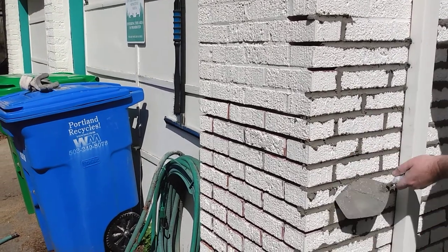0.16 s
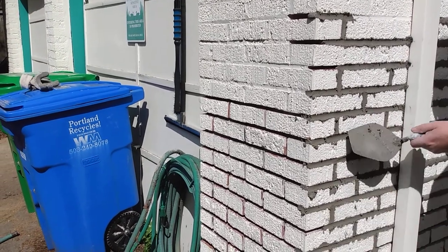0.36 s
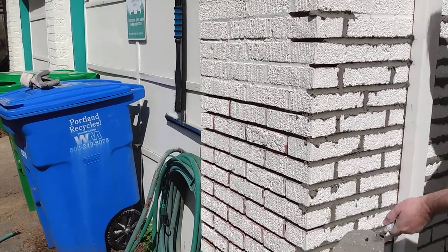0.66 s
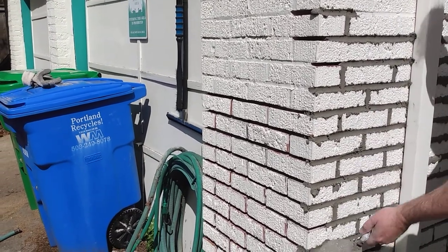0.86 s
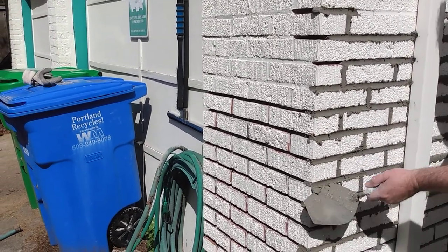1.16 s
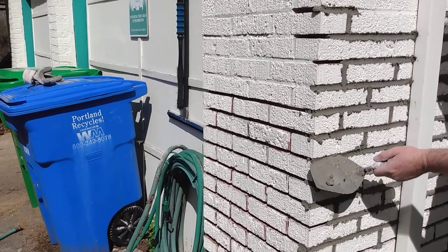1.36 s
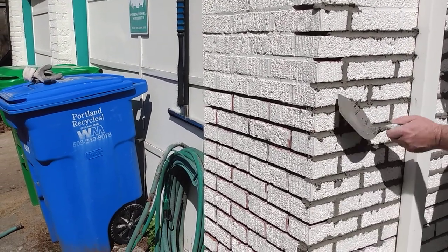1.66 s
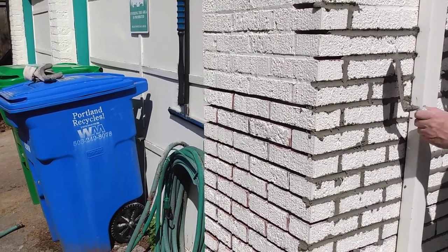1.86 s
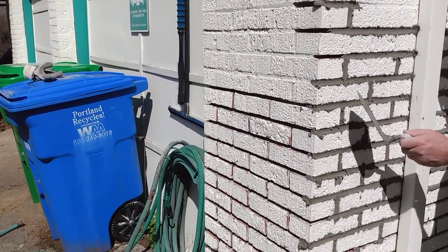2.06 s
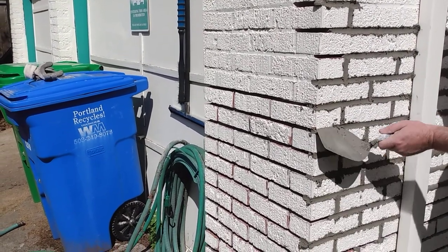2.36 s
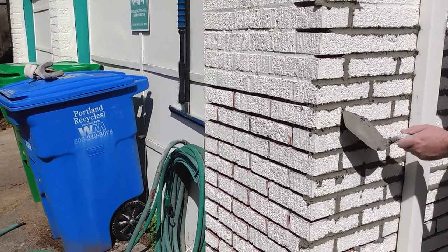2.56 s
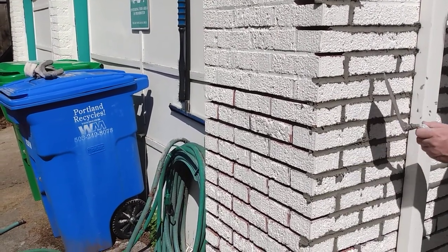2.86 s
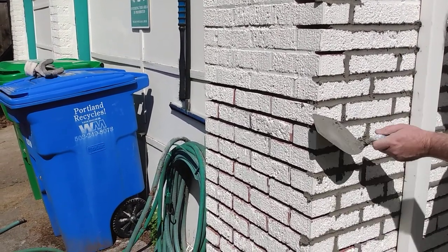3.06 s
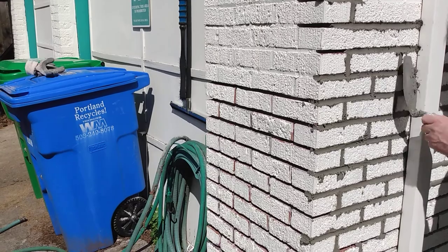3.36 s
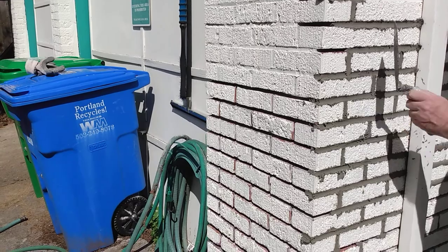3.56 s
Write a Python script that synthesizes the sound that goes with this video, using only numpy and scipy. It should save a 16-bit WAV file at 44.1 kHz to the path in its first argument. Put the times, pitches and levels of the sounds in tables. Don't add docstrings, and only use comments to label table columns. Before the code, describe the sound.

A steel trowel scrapes gritty mortar on brick, close in stereo outdoors. The first stuttering rasp runs 0-0.37 s, the blade briefly ringing on as crumbs patter. Scrapes follow at 0.93-1.45, 1.55-1.9 and 2.33-2.68 s, then a short, lighter one at 2.73-2.82. After a pause, the loudest stroke scratches from 3.18 to 3.45 s, ending in a sharp metallic catch and falling bits. Low distant traffic hums throughout.

```python
import sys
import numpy as np
from scipy import signal
from scipy.fft import rfft, irfft
from scipy.io import wavfile
from scipy.ndimage import uniform_filter1d

SR = 44100
rng = np.random.default_rng(int(sys.argv[2]) if len(sys.argv) > 2 else 0)


def pcm_store(signal):
    levels = np.round(np.clip(np.atleast_2d(signal), -1, 1) * 32767)
    wavfile.write(sys.argv[1], SR, levels.astype(np.int16).T)


def convert_level_to_amplitude(level_db):
    exponent = np.asarray(level_db, float) / 20
    return 10 ** exponent


N = 163170

# (frequency [Hz], level [dB])
TRAFFIC = [(22, -18.5), (38, -5.5), (75, -1), (289, -8.5), (928, -8.5), (2760, -32.5), (7810, -42),
           (14000, -39.5), (16300, -45)]
# (frequency [Hz], likeness [0 to 1])
TRAFFIC_LIKENESS = [(40, 0.97), (300, 0.94), (2000, 0.05)]
# (start [s], length [s], hiss level [dB], thud level [dB])
CRUMBS = [(0.45, 0.077, -48, -43), (0.37, 0.062, -63, -68), (2.034, .02, -61.5, -70),
          (0.574, 0.0047, -57, -82), (0.595, 0.0033, -56, -59), (0.63, .003, -61, -72),
          (0.648, 0.0044, -60, -70), (0.741, .004, -63, -71), (0.762, .003, -62, -85),
          (0.776, .003, -63, -85), (0.796, .004, -60, -85), (0.825, .004, -58, -85),
          (0.836, 0.011, -63, -87), (0.855, .003, -61, -85), (0.902, .006, -64, -85),
          (0.918, 0.0033, -55, -85), (3.028, .003, -59.5, -78), (3.055, .003, -72, -75),
          (1.476, 0.023, -51, -51), (1.938, 0.008, -56, -90), (1.99, 0.025, -49.5, -63),
          (2.246, 0.0027, -65, -88), (2.293, .003, -63, -82.5), (3.48, 0.0059, -38.5, -30.5),
          (3.504, 0.013, -85, -45)]
# (frequency [Hz], level [dB])
GRIT = [(700, -25), (1500, -2), (4400, -4), (7700, -5), (10400, 0), (14100, 3), (15800, -6), (16200, -37)]
# (frequency [Hz], width [Hz], level [dB])
WALL = [(295, 16, -6.5), (434, 182, 8), (646, 15, -2), (960, 440, -31)]
# (frequency [Hz], width [Hz])
BLADE = [(1104, 14), (1200, 24), (1555, 26), (1712, 60), (1772, 17), (1970, 26), (2308, 28), (2438, 21),
         (2572, 26), (2850, 34), (3280, 22), (3844, 28), (4150, 36), (4750, 130)]
# (level of each BLADE ring [dB], ...)
GRIP = [(-17, -9.5, -22.5, -12, 1.5, -18, -17, -12.5, -25.5, -14.5, -12, -17.5, -24.5, -36.5),
        (-23.5, -10.5, -33, -25.5, -0.5, -16.5, -16.5, -13, -29.5, -15, -13, -55, -58, -57),
        (-31.5, -13.5, -18, -21.5, -7, -22, -14, -4.5, -21, -16, -10, -18, -19, -32.5),
        (-15, -15, -14, -16, -9.5, -23, -18, -9, -21, -16, -14, -20, -16.5, -26),
        (-27, -0.5, -28, -16, 3.5, -12.5, -5, 1, -2, -26, -12, -27, -8, -12),
        (-21, -7.5, -15, -8.5, -12.5, -13.5, -6.5, -7.5, -8, -14.5, -19, -13, -22.5, -17)]
# (frequency [Hz], width [Hz], level [dB])
EDGE = [(2580, 450, -18.5), (3260, 100, -16.5), (3640, 250, -22.5), (4125, 160, -21), (4636, 180, -22.5),
        (5590, 150, -24.5), (5850, 130, -20), (6090, 130, -21.5), (6560, 120, -28)]
# (frequency [Hz], time to fall 60 dB [s])
FREE_BLADE = [(1104, .5), (1774, .18), (2304, .2), (2441, .2)]
# (time [s], time until damped [s], then the level of each FREE_BLADE ring [dB])
LIFTS = [
    (.36, .3, -29.5, -25, -33, -35),
    (1.899, 0.094, -36.5, -40, -45.5, -52),
    (2.78, 0.187, -32.5, -44, -60, -53),
    (3.435, 0.057, -34, -46, -32, -45),
]
# (time [s], length [s], grit level [dB], blade level over grit [dB])
FIRST = [(0, 0.019, -42.5, -3.5), (.03, 0.033, -47.5, 8.5), (.056, 0.0071, -51, -2),
         (.066, 0.013, -50, 12.5), (.085, 0.009, -43.5, 2.5), (.1, 0.029, -42, 6), (.134, 0.016, -39, 1),
         (.154, 0.046, -49.5, 8), (.207, 0.0045, -39, 4), (.216, 0.035, -47.5, 9),
         (.257, 0.0073, -40.5, 1.5), (.279, 0.0088, -33.5, -4.5), (.329, 0.012, -40.5, 3),
         (.359, 0.0091, -32, 7)]
SECOND = [(0.932, 0.0072, -34.5, -11.5), (0.952, 0.046, -52.5, -4), (0.984, 0.023, -43.5, 8.5),
          (1.01, 0.01, -51.5, 17), (1.024, 0.012, -39, 12), (1.055, 0.023, -43, 10.5),
          (1.099, 0.021, -50, 15.5), (1.133, 0.013, -50.5, 15), (1.144, 0.0075, -47, 9),
          (1.17, 0.012, -39, 3.5), (1.226, 0.013, -37.5, 0.5), (1.243, 0.0074, -51, 18.5),
          (1.257, 0.029, -72, 8), (1.283, 0.012, -42, 6.5), (1.325, 0.028, -48.5, 14),
          (1.364, 0.011, -52.5, 16.5), (1.393, 0.0059, -45.5, 5), (1.414, 0.0042, -42, 8.5),
          (1.419, 0.0099, -48, 5), (1.436, 0.0031, -39.5, -3.5)]
THIRD = [(1.548, 0.015, -48, 12), (1.59, 0.011, -38, -1), (1.624, 0.022, -47.5, 8),
         (1.677, 0.026, -46.5, 6), (1.71, 0.009, -47.5, 8.5), (1.732, 0.017, -44, 8),
         (1.764, 0.0068, -29.5, -8), (1.78, 0.007, -33, -9), (1.793, 0.016, -37, 3.5),
         (1.809, .01, -37, -1), (1.821, .014, -40.5, 7), (1.838, 0.0062, -39.5, -1.5),
         (1.855, 0.0059, -36.5, 0), (1.886, 0.022, -43.5, -2)]
FOURTH = [(2.327, 0.014, -45.5, -10), (2.353, 0.009, -40.5, -6), (2.37, 0.011, -39, 1),
          (2.389, 0.01, -33.5, -1), (2.402, 0.0089, -32, -3), (2.417, 0.0072, -35.5, -13),
          (2.427, 0.05, -43, -3.5), (2.48, 0.055, -39.5, -11), (2.548, 0.0086, -36, -0.5),
          (2.566, 0.019, -42.5, 1), (2.583, 0.0056, -44, 2.5), (2.597, 0.022, -38, 2),
          (2.629, 0.052, -47, -0.5)]
FIFTH = [(2.726, 0.011, -52.5, 4.5), (2.754, 0.0029, -40.5, 5.5), (2.761, 0.01, -53, 7.3),
         (2.777, 0.0058, -45.5, 7.4), (2.791, .014, -45, 2.3), (2.809, 0.007, -36, 1.2)]
SIXTH = [(3.179, 0.0066, -45.5, 0.5), (3.191, 0.022, -54.5, 9), (3.245, 0.0067, -30, -11.5),
         (3.281, 0.008, -31.5, -11), (3.293, 0.032, -37.5, 2), (3.319, 0.05, -36.5, 4),
         (3.359, 0.037, -33, 4.5), (3.388, 0.0088, -33.5, 7.5), (3.398, .01, -31, 5),
         (3.411, 0.0055, -34, 9), (3.418, 0.012, -23, -15), (3.427, 0.0098, -26.5, 5.5),
         (3.443, 0.0064, -43.5, 9.5)]
# (wall level [dB], coarse grit level [dB])
STROKES = [(-48.5, -17), (-50.5, -7), (-52.5, -1), (-57, -15), (-56.5, -18), (-56, -10)]
# (frequency [Hz], level [dB])
LEFT_OVER_RIGHT = [(500, -.5), (2000, 3), (4000, -2.05), (8000, -4), (13000, -1)]
# (frequency [Hz], phase [radians])
LEFT_LEAD = [(0, 0), (1800, 2.0), (2430, 1.3), (3360, 3.2), (4130, 5.7), (5900, 7), (22050, 25)]


def evened(x):
    return x / np.sqrt(np.mean(x ** 2) + 1e-20)


def read(points, hz):
    f, value = np.transpose(points)
    return np.interp(np.log(hz + 1), np.log(f + 1), value)


def colour(x, points):
    gain = convert_level_to_amplitude(read(points, np.fft.rfftfreq(N, 1 / SR)))
    return irfft(rfft(x) * gain, N)


def ring(x, hz, width):
    r = np.exp(-np.pi * max(width, 1) / SR)
    pole = r * np.exp(2j * np.pi * hz / SR)
    return np.sqrt(4 * (1 - r)) * signal.lfilter([1], [1, -pole], x).real


def air():
    wash_db, hum_db = -51, -51
    hum_hz, hum_width = 65.3, 17.2
    hz = np.fft.rfftfreq(N, 1 / SR)
    left, other = rfft(rng.standard_normal((2, N)))
    same = np.clip(read(TRAFFIC_LIKENESS, hz), -1, 1)
    right = same * left + np.sqrt(1 - same ** 2) * other
    wash = evened(irfft(np.array([left, right]) * convert_level_to_amplitude(read(TRAFFIC, hz)), N))
    hums = []
    for noise in rng.standard_normal((3, N)):
        once = ring(noise - np.roll(noise, 1), hum_hz, hum_width)
        hums.append(evened(ring(once, hum_hz, hum_width)))
    hum = hums[0] + 0.38 * np.array(hums[1:])
    return convert_level_to_amplitude(wash_db) * wash + convert_level_to_amplitude(hum_db) * hum


def yard(x):
    u = np.arange(SR // 4) / SR
    taps = rng.standard_normal((2, len(u)))
    taps = taps * (rng.random((2, len(u))) < .06)
    taps = taps * convert_level_to_amplitude(-60 * u / .11) * (u > .0015)
    return signal.fftconvolve(x[None], taps / np.linalg.norm(taps[0]), axes=1)[:, :N]


def grain(per_s):
    size = rng.exponential(1, N) * (rng.random(N) < per_s / SR)
    return evened(1 + .8 * signal.lfilter([1], [1, -.97], size))


def hiss():
    patch_db = 3.5
    z = rng.standard_normal((3, N))
    s = signal.stft(colour(z[0] + 1.1 * z[1:], GRIT), nperseg=256)[2]
    patch = rng.standard_normal(s.shape[1:])
    patch = uniform_filter1d(patch, size=7, axis=0)
    patch = evened(uniform_filter1d(patch, size=4, axis=1))
    return evened(signal.istft(s * convert_level_to_amplitude(patch_db * patch), nperseg=256)[1][:, :N])


def crumbs():
    t, env = np.arange(N) / SR, np.zeros((2, N))
    fall = np.array([[1400], [450]])
    for s, length, hiss_db, thud_db in CRUMBS:
        rise = np.clip((t - s) / .002, 0, 1)
        shape = rise * convert_level_to_amplitude(-np.maximum(t - s - length, 0) * fall)
        env += convert_level_to_amplitude([[hiss_db], [thud_db]]) * shape
    z = rng.standard_normal(N)
    thud = evened(ring(ring(z, 1000, 1800), 1100, 2000))
    return grain(450) * (env[0] * hiss() + env[1] * thud)


def force():
    rise_share = .08
    bite, bite_s, glance_s = 3.08, 0.0033, 0.013
    drop_s, settle_db, settle_s = 0.00075, -21.5, 0.0053
    u = np.arange(SR // 5) / SR
    env = np.zeros((3, N))
    now = np.zeros((2, N), int)
    count = 0
    for k, contacts in enumerate((FIRST, SECOND, THIRD, FOURTH, FIFTH, SIXTH)):
        for s, length, db, blade_db in contacts:
            start = round(s * SR)
            now[:, start:] = [[k], [count]]
            count += 1
            after = np.maximum(u - length, 0)
            hold = np.minimum(u / (rise_share * length), 1)
            hold = hold * (1 + bite * np.exp(-u / bite_s - length / glance_s))
            release = np.exp(-after / drop_s) + convert_level_to_amplitude(settle_db) * np.exp(-after / settle_s)
            wall_db = STROKES[k][0] + .3 * (db + 43)
            part = env[:, start:][:, :len(u)]
            push = convert_level_to_amplitude([[db], [db + blade_db], [wall_db]]) * hold * release
            part += push[:, :part.shape[1]]
    env[:2] *= grain(500)
    env[2] = signal.lfilter([.003], [1, -.997], env[2])
    return env, now


def lift_rings(out):
    u = np.arange(SR // 2) / SR
    for s, free_s, *lift_db in LIFTS:
        part = out[round(s * SR):][:len(u)]
        damped = 810 * np.maximum(u - free_s, 0)
        for db, (hz, t60) in zip(lift_db, FREE_BLADE):
            level = np.minimum(u / 0.0061, 1) * convert_level_to_amplitude(db - 60 * u / t60 - damped)
            tone = level * np.sin(2 * np.pi * (hz * u + rng.random()))
            part += tone[:len(part)]


def trowel():
    (grit, blade, wall), (stroke, contact) = force()
    z = rng.standard_normal((3, N))
    blade_spot = convert_level_to_amplitude(2 * rng.standard_normal((80, 20)))
    edge_spot = convert_level_to_amplitude(4 * rng.standard_normal((80, len(EDGE))))
    out = convert_level_to_amplitude(1.16) * sum(convert_level_to_amplitude(db) * ring(wall * z[1], hz, width) for hz, width, db in WALL)
    for k, (hz, width) in enumerate(BLADE):
        grip = convert_level_to_amplitude(np.array(GRIP)[:, k])
        out += ring(grip[stroke] * blade_spot[contact, k] * blade * z[0], hz, width)
    lift_rings(out)
    chips = grit * (z[2] + 0.88 * rng.standard_normal((2, N)))
    for k, (hz, width, db) in enumerate(EDGE):
        out = out + convert_level_to_amplitude(db) * ring(edge_spot[contact, k] * chips, hz, width)
    fine = hiss()
    coarse = colour(fine, [(6300, 0), (7600, -30)])
    coarse_gain = convert_level_to_amplitude(np.array(STROKES)[stroke, 1])
    return out + grit * convert_level_to_amplitude(-1.0) * (fine + (coarse_gain - 1) * coarse)


def scene():
    near = trowel() + crumbs()
    lag = np.interp(np.fft.rfftfreq(N, 1 / SR), *np.transpose(LEFT_LEAD))
    left = colour(near[0], LEFT_OVER_RIGHT)
    right = irfft(rfft(near[1]) * np.exp(-1j * lag), N)
    return np.array([left, right]) + convert_level_to_amplitude(-11.5) * yard(near[0]) + air()


def low_pass(x):
    return signal.sosfilt(signal.butter(12, 16990, fs=SR, output="sos"), x)


def record(dry):
    mix = colour(dry, [(28, -5.5), (46, -2.5)])
    return low_pass(mix)


dry = scene()
out = record(dry)
pcm_store(out)
```